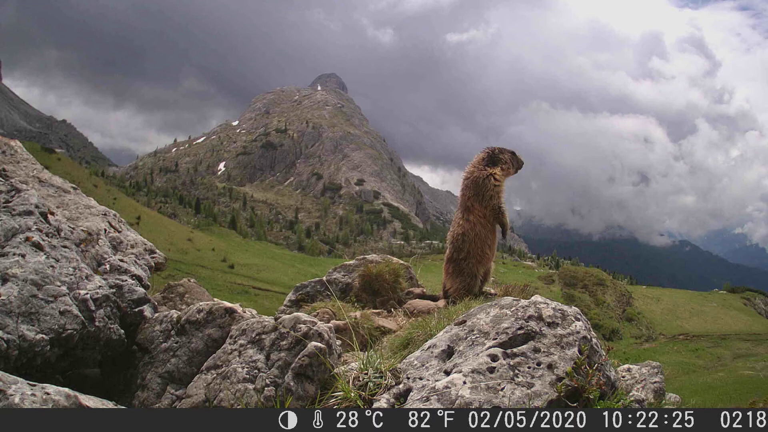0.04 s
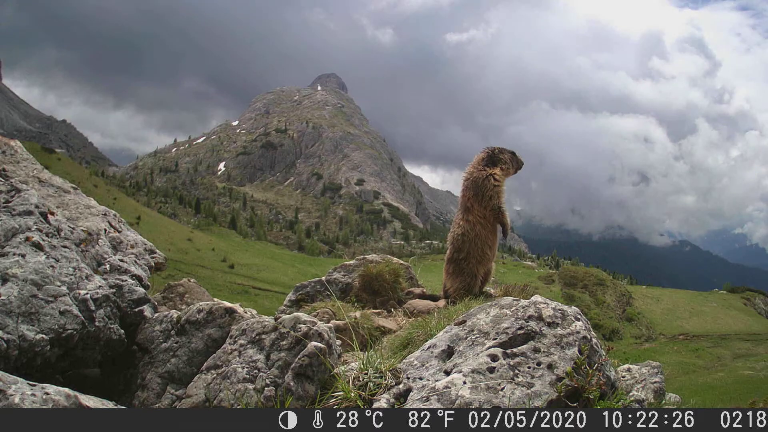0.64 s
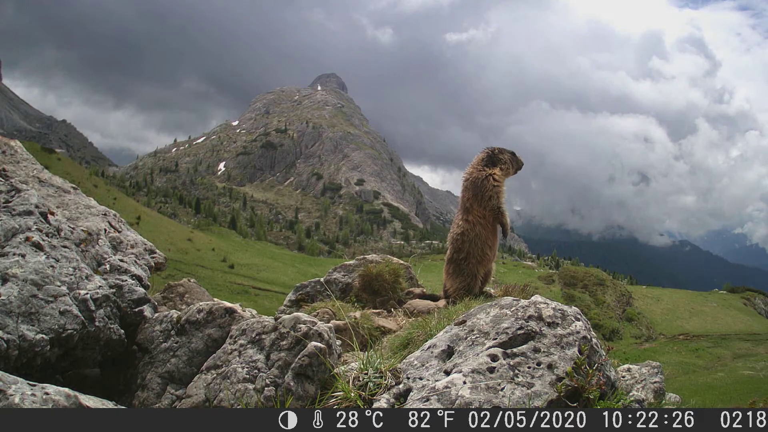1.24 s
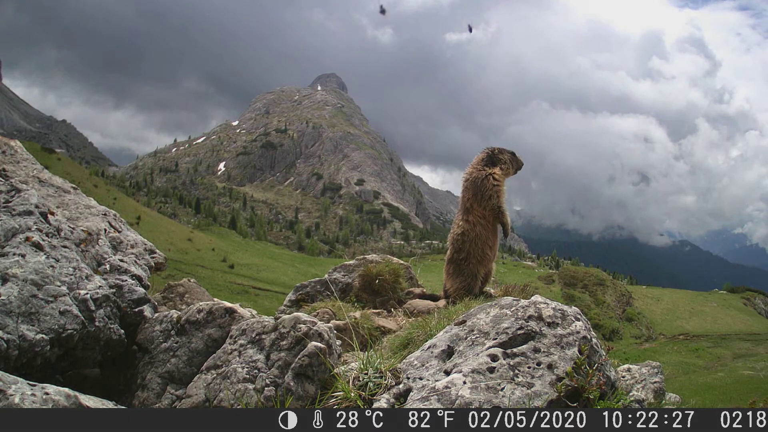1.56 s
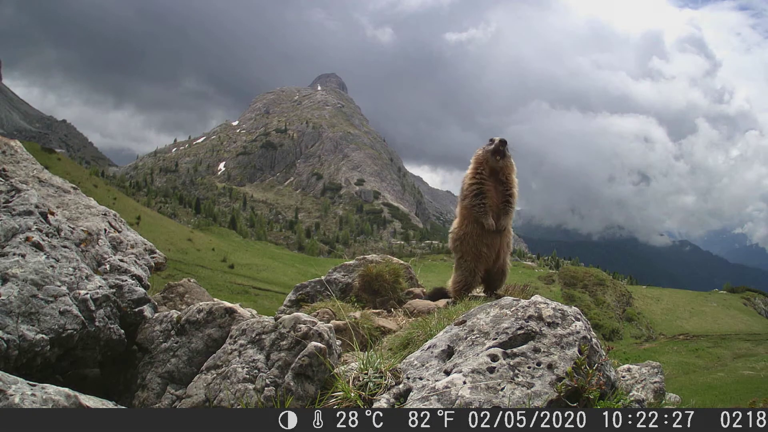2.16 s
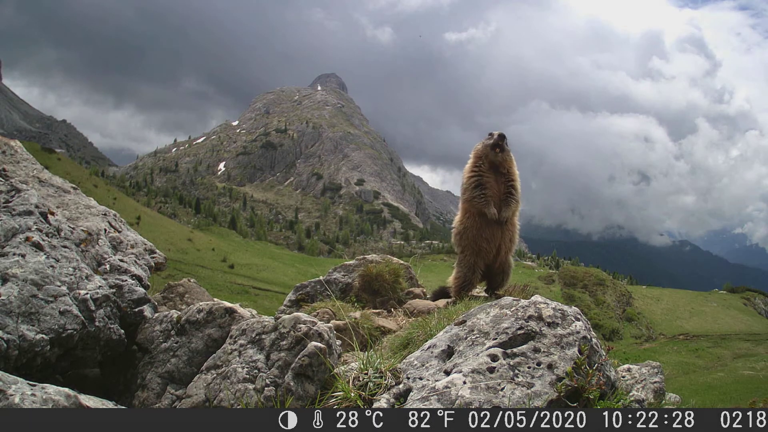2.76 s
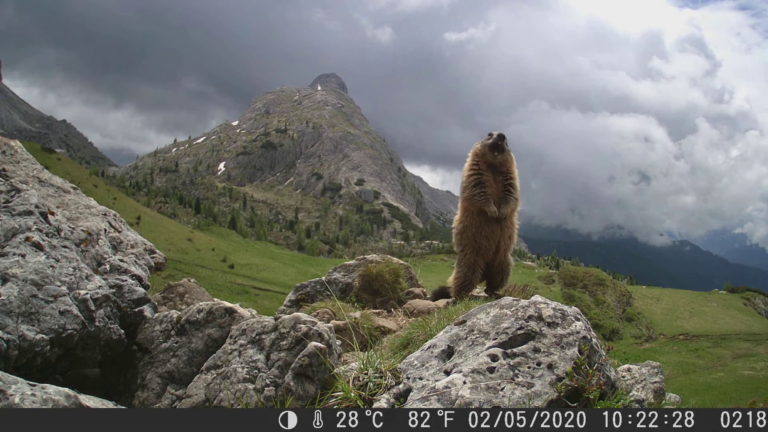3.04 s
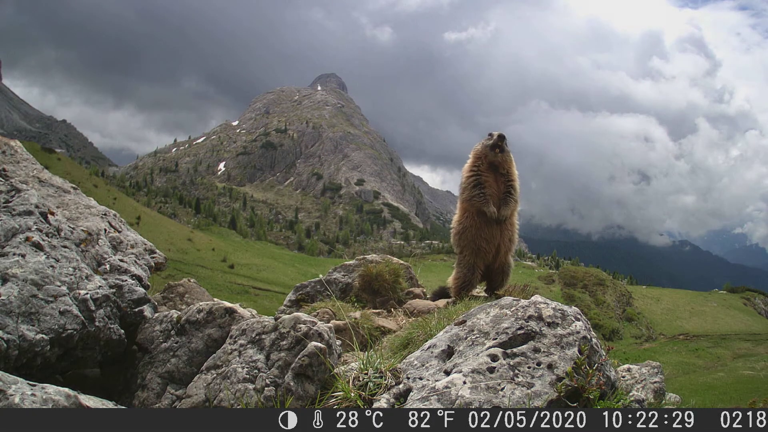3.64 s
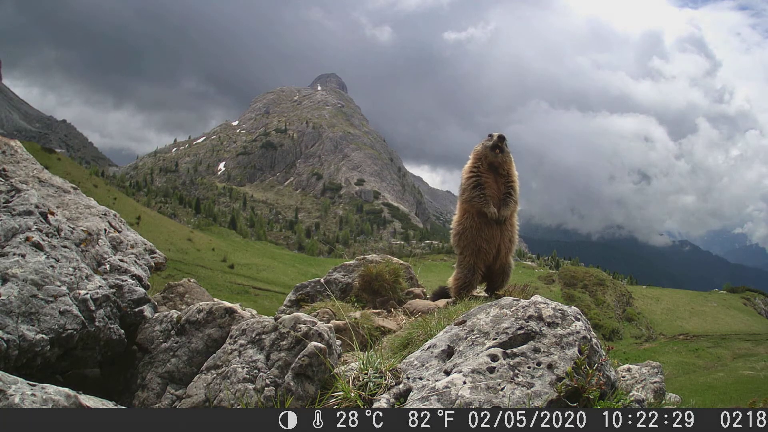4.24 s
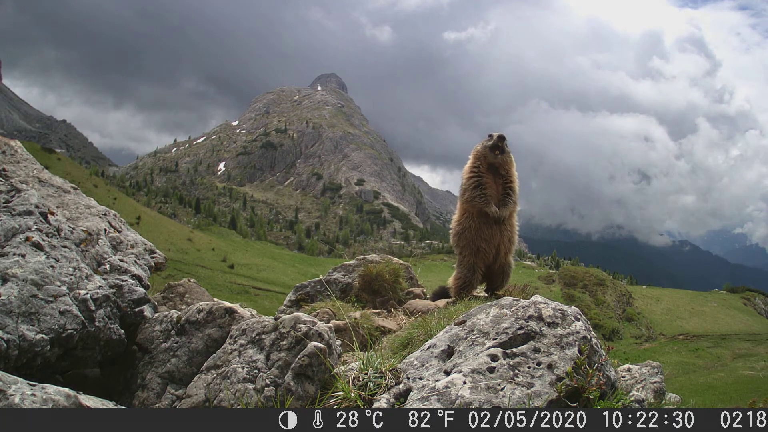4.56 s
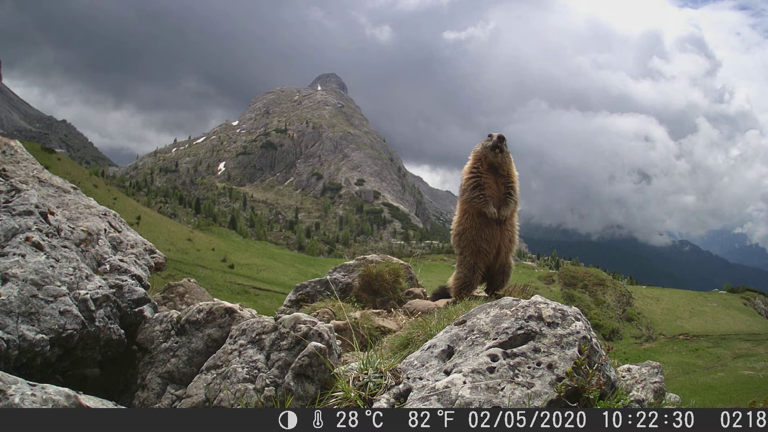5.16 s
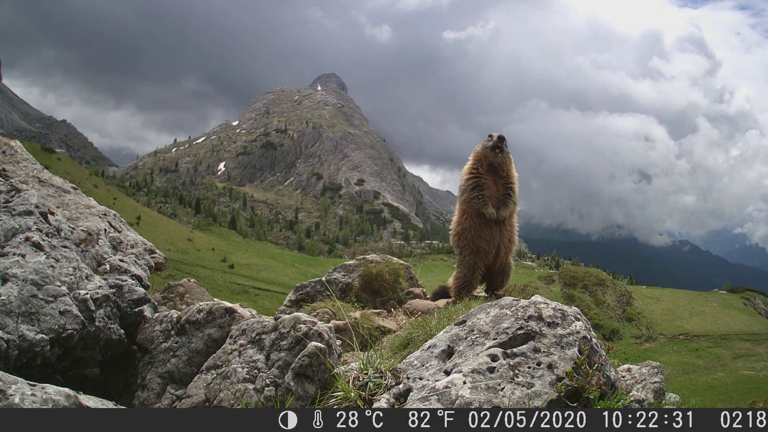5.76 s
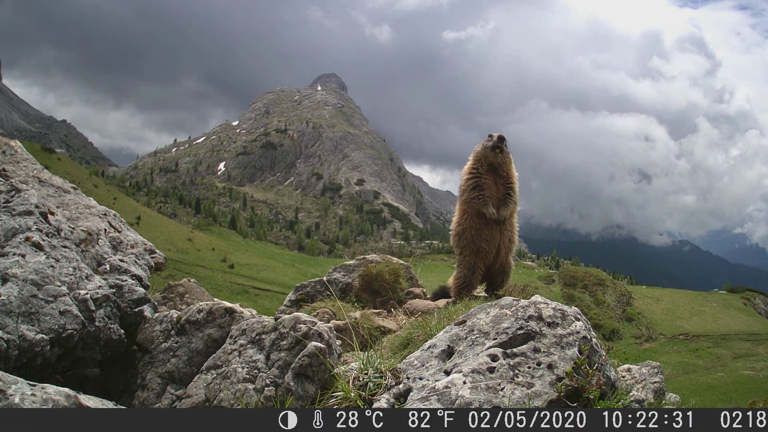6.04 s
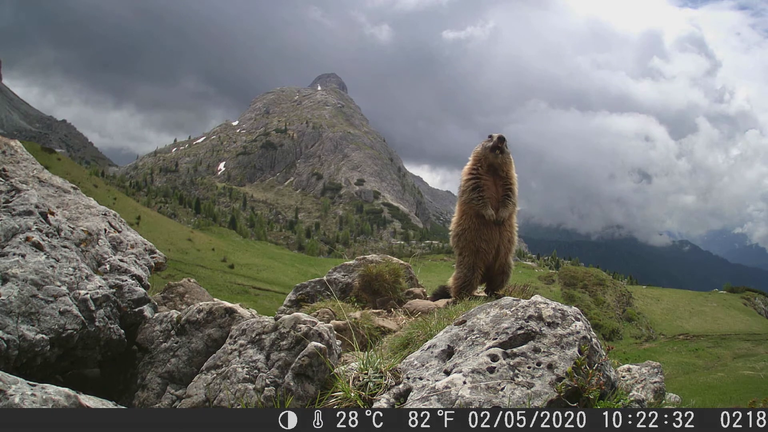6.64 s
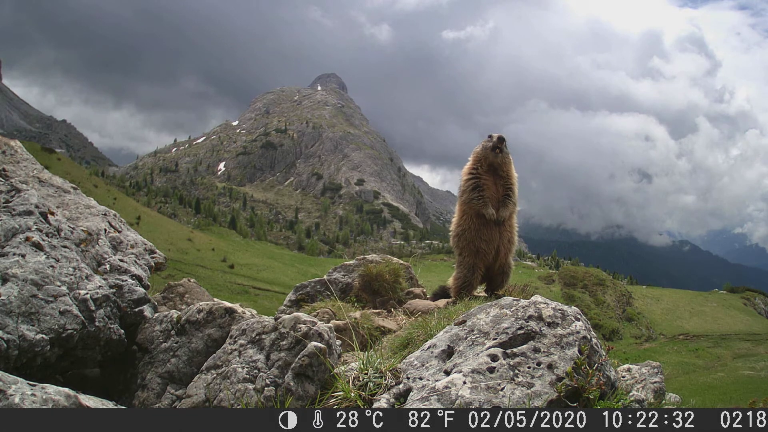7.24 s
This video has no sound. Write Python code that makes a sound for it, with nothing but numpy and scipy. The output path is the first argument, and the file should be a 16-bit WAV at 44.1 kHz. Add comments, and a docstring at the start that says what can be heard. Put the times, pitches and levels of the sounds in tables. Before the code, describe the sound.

Seven short, shrill marmot whistles ring out close to a mono microphone in an open mountain meadow. Before them come a dull switch-on thump, a stretch of quiet wind rumble and hiss, and a soft thud on turf with the first call. The whistles arch quickly in pitch, slightly raspy and glassy, and come ever further apart, answered faintly by rocks and slope while low gusts grow stronger.

```python
"""A dull thump as a trail camera's microphone switches on in a mountain meadow; wind rumbles on it over hiss.
Close by, a marmot on a rock jerks upright with a soft thud and gives seven piercing alarm whistles.
Each is one fast arch of pitch, answered faintly by the rocks and the slope. The camera's housing colours
the whistles and its coarse sampling adds glassy mirror tones. One microphone, so the sound is mono."""
import sys
import numpy as np
from scipy import signal
from scipy.fft import rfft, irfft
from scipy.io import wavfile
from scipy.ndimage import uniform_filter1d, map_coordinates

SR = 44100
rng = np.random.default_rng(int(sys.argv[2]) if len(sys.argv) > 2 else 0)


def to_wav(sig):
    """Store sig (one row per channel, or 1-D mono) as 16-bit WAV at the path in sys.argv[1].

    Samples outside -1..1 are clipped; the rate is SR.
    """
    pcm = np.clip(np.atleast_2d(sig), -1, 1) * 32767
    pcm = np.round(pcm).astype(np.int16)
    wavfile.write(sys.argv[1], SR, pcm.T)  # frames by channels


N = 326340
TIME = np.arange(N) / SR
SWITCH_ON_S = .1236


def amp(db):
    """Decibels to gain."""
    return 10 ** (np.asarray(db) / 20)


def unit_rms(x):
    """Scales to rms 1."""
    return x / np.sqrt(np.mean(x ** 2) + 1e-20)


def ease(t, width_s):
    """A smooth step from 0 to 1 around time zero."""
    return (1 + np.tanh(t / width_s / 2)) / 2


def response(points, size):
    """Gain of a table (f/Hz, level/dB) on the bins of a transform."""
    hz, db = np.transpose(points)
    bins_hz = np.fft.rfftfreq(size, 1 / SR)
    return amp(np.interp(np.log(bins_hz + 1), np.log(hz + 1), db))


def noise(points):
    """Steady noise of rms 1 with the given spectral shape."""
    return unit_rms(irfft(rfft(rng.standard_normal(N)) * response(points, N), N))


def waver(length, rate_hz):
    """A smooth random wobble of rms 1, mostly slower than the rate."""
    hz = np.fft.rfftfreq(length, 1 / SR)
    slow = np.exp(-(hz / rate_hz) ** 2) * (hz > 0)
    return unit_rms(irfft(rfft(rng.standard_normal(length)) * slow, length))


def coloured(x, points, size=4096):
    """Causal filter: resonances ring after the sound that excites them."""
    cepstrum = irfft(np.log(response(points, size)))
    cepstrum[1:size // 2] *= 2  # folded for minimum phase
    cepstrum[size // 2 + 1:] = 0
    return signal.oaconvolve(x, irfft(np.exp(rfft(cepstrum))))[:N]


def add(mix, start_s, sound):
    """Mixes a sound in at its time."""
    part = mix[round(start_s * SR):][:len(sound)]
    part += sound[:len(part)]


# Spectrum of the noise floor at the microphone: f/Hz, relative level/dB
HISS = [(20, -4), (120, 5), (300, -1), (600, -6), (1000, -10), (1800, -14.5), (2800, -19.5), (3400, -25),
        (4500, -30), (7500, -29), (8500, -32.5), (9300, -54), (15000, -53.5)]
def hiss(level_db=-64.5):
    """A faint, steady hiss behind everything."""
    return amp(level_db) * noise(HISS)


# Gusts crossing the meadow and striking the microphone: t/s, relative level/dB
GUSTS = [(0.28, -60), (0.46, -47.5), (0.65, -58.5), (1.15, -54.5), (1.33, -51), (1.5, -56.5), (3.2, -57.5),
         (4.43, -56), (4.58, -46.5), (4.75, -54), (5.02, -56.5), (5.16, -46.5), (5.38, -54.0),
         (5.58, -41.5), (5.7, -52), (5.82, -41), (5.98, -49), (6.16, -37.5), (6.45, -51), (6.6, -45),
         (6.86, -57), (7.18, -57.5), (7.35, -40.5)]
# Spectra of the eddies at the microphone and the buffets on its housing: f/Hz, relative level/dB
RUMBLE = [(5, -12), (17, 14.5), (38, 2), (65, -4), (95, -29.5), (112, -18), (135, -31), (220, -37.5),
          (450, -55), (1000, -83)]
BUFFET = [(30, -30), (80, 7), (125, -3.0), (200, -15), (400, -31), (1000, -71.5)]
def wind(rumble_db=2, buffet_db=-13, buffet_growth=1.2, breeze_db=-45, lumps_db=2.0):
    """Low eddies at the microphone come in lumps; strong gusts also buffet the housing, higher in pitch."""
    gust_db = np.interp(TIME, *np.transpose(GUSTS)) + lumps_db * waver(N, rate_hz=13)
    eddies = noise(RUMBLE)
    eddies /= np.sqrt(uniform_filter1d(eddies ** 2, size=6000))  # the gusts alone set the swell
    buffets = amp(breeze_db + buffet_db + buffet_growth * (gust_db - breeze_db)) * noise(BUFFET)
    return amp(gust_db + rumble_db) * eddies + buffets


# Colour of the thump inside the camera: f/Hz, level/dB
THUMP = [(20, -0.5), (3000, -1.5), (4000, -15), (8000, -7.0), (10000, -14.5)]
def switch_on(step_db=-28, settle_s=0.1):
    """The microphone's supply jumps on and settles: one dull thump."""
    t = np.maximum(TIME - SWITCH_ON_S, 0)
    step = amp(step_db) * np.exp(-t / settle_s) * (TIME >= SWITCH_ON_S)
    return coloured(step, THUMP)


def foot(start_s=1.968, level_db=-40, hz=85, ring_s=0.014):
    """A soft thud on the turf near the camera as the marmot jerks upright for its first call."""
    t = np.maximum(TIME - start_s, 0)
    return amp(level_db) * np.exp(-t / ring_s) * np.sin(2 * np.pi * hz * t)


# Reflections from the nearby rocks: delay t/s, level/dB
ROCKS = [(.0043, -23.5), (.0071, -16.5), (0.0095, -30.5), (0.02, -36.5)]
# Colour of all that returns from the rocks and the slope: f/Hz, level/dB
SLOPE = [(500, -24.5), (1400, -12), (1900, -11), (2350, -6), (2720, -1), (3100, -5), (3700, -22.5),
         (8000, -15.5)]
def meadow(x, near_db=-23.5, near_t60_s=.17, far_db=-47, far_t60_s=.4):
    """What comes back to the microphone: a few rock reflections and a short faint scatter off the slope."""
    t = TIME[:SR]
    near, far = rng.standard_normal((2, SR)) * (1 - np.exp(-t / 0.0023))
    near *= amp(-60 * t / near_t60_s)
    far *= amp(-60 * t / far_t60_s)
    echo = amp(near_db) * near / np.linalg.norm(near) + amp(far_db) * far / np.linalg.norm(far)
    for delay_s, db in ROCKS:
        add(echo, delay_s, amp([db]))
    return coloured(signal.oaconvolve(x, echo)[:N], SLOPE)


# Spectrum of the grit that the camera's coarse steps add to a loud sound: f/Hz, relative level/dB
GRIT = [(300, -5), (1800, -2.5), (3400, -1), (3900, -11.5), (4600, -1), (6800, 4.5), (8000, -13),
        (9300, -1), (11000, -4.5), (12500, -12.5)]
def coarse_sampling(x, clock_hz=16000, drift_s=3e-6, grit_db=-29.0):
    """Each sample is held until the next: a tone gains mirror tones, the strongest sinking as it rises."""
    clock = TIME + drift_s * waver(N, rate_hz=100)
    held_s = (clock * clock_hz % 1) / clock_hz
    stairs = map_coordinates(x, [(TIME - held_s) * SR], order=3, mode="nearest")
    running_rms = np.sqrt(abs(uniform_filter1d(x ** 2, size=90)))
    return stairs + amp(grit_db) * running_rms * noise(GRIT)


# Spectrum of the breath at the marmot's mouth: f/Hz, relative level/dB
PUFF = [(500, -21.5), (1100, -2.5), (1700, 5.5), (2600, -7), (3500, -10), (6000, -28.5)]
def puffs(calls, level_db=-30, lead_s=0.0086, width_s=0.012):
    """Turbulent air just ahead of each tone, stronger in a rough call."""
    breaths = sum(rough * np.exp(-((TIME - attack_s + lead_s) / width_s) ** 2)
                  for attack_s, *_, rough in calls)
    return amp(level_db) * breaths * noise(PUFF)


def pitch_arch(t, length_s, crest_hz, sag_hz_per_s, start_hz=901.6, sag_lead_s=.034, sag_ease_s=.0071):
    """Pitch in Hz: it sweeps up, fastest just before the attack, hangs at the crest, then sags steadily."""
    sweep_hz = (crest_hz - start_hz) * ease(t + .0063, width_s=.0068)
    sagging_s = sag_ease_s * np.logaddexp(0, (t - length_s + sag_lead_s) / sag_ease_s)
    return start_hz + sweep_hz - sag_hz_per_s * sagging_s


def squeak(t, level_db=-23.5, lead_s=0.016, width_s=.0058, rasp=.25):
    """Envelope of the soft, hoarse squeak that comes before the voice opens."""
    hump = amp(level_db) * np.exp(-((t + lead_s) / width_s) ** 2)
    return hump * (1 + rasp * waver(len(t), rate_hz=700))


def whistle(attack_s, length_s, crest_hz, sag_hz_per_s, attack_db, top_db, fall_db, rough,
            jitter=.02, shimmer=.55, relax=0.56, octave_db=-19, rasp_db=-19):
    """A nearly pure tone arches and flutters at its strained top; returns its start time and sound."""
    t = np.arange(-.035, length_s + .025, 1 / SR)  # zero at the attack
    # The voice snaps open with a burst, is choked at the crest, swells as the pitch sags, and shuts.
    opening = ease(t + .005, width_s=.0005)
    burst = ease(.0088 - t, width_s=.002)
    swell = ease(t - length_s + .023, width_s=.0045)
    shutting = ease(length_s + .0095 - t, width_s=.0015)
    level_db = top_db + (attack_db - top_db) * burst + (fall_db - top_db) * swell
    voiced = amp(level_db) * opening * shutting
    strain = rough * (1 - relax * swell)
    hz = pitch_arch(t, length_s, crest_hz, sag_hz_per_s)
    hz *= 1 + jitter * strain * waver(len(t), rate_hz=620)
    phase = 2 * np.pi * np.cumsum(hz) / SR
    flutter = 1 + shimmer * strain * (1 - burst / 2) * (1 - swell / 2) * waver(len(t), rate_hz=200)
    # Turbulence puts a noisy skirt around the tone.
    rasp = amp(rasp_db) * np.sqrt(strain) * waver(len(t), rate_hz=1300)
    tone = (1 + rasp) * np.sin(phase) + amp(octave_db) * np.sin(2 * phase)
    return attack_s + t[0], (voiced * flutter + squeak(t)) * tone


# The calls as they leave the rock: attack t/s, length from attack to loud fall t/s, crest f/Hz,
# sag/(Hz/s), attack level/dB, top level/dB, fall level/dB, roughness/(0-1)
WHISTLES = [(1.96, 0.098, 3280, 24870, -8, -27.5, -15.5, 0.81),
            (2.461, 0.077, 3209, 22420, -11, -23.5, -17, 0.53),
            (3.0033, 0.072, 3189, 21140, -11.5, -25.5, -20.5, 0.5),
            (3.6691, 0.071, 3180, 21000, -12, -22, -18.5, 0.4),
            (4.3696, 0.074, 3165, 21030, -11.5, -23, -19.5, .33),
            (5.294, 0.077, 3181, 21960, -11.5, -22.5, -17.5, .28),
            (6.3482, 0.072, 3160, 21660, -11, -22.5, -17.5, 0.37)]
# Response of the microphone in its housing, facing the animal: f/Hz, level/dB
HOUSING = [(500, -15.5), (1000, -9), (1420, -11), (1750, -17.5), (2130, -9), (2310, -5.5), (2450, -1.5),
           (2820, -6), (2965, -17.5), (3060, -6.5), (3350, -6), (3850, -30.5), (4500, -4.5), (5100, -19),
           (7500, -18.5)]
def marmot():
    """Whistles at close range, direct and off the meadow; only they are loud enough for mirror tones."""
    voice = puffs(WHISTLES)
    for call in WHISTLES:
        add(voice, *whistle(*call))
    return coarse_sampling(coloured(voice, HOUSING) + meadow(voice))


def scene():
    """Close whistles over wind and hiss, one microphone feeding both channels."""
    background = (wind() + hiss()) * (TIME >= SWITCH_ON_S)
    return np.tile(background + switch_on() + foot() + marmot(), (2, 1))


# Overall treble shape, with a notch near 12 kHz and fading above 14 kHz: f/Hz, level/dB
TREBLE = [(20, 3.5), (11200, -0.5), (12000, -20), (12700, -1), (13900, 1), (14450, -17.5), (15300, -30.5)]
def record(dry, edge_hz=15300):
    """Dulls the highest treble and cuts it off near 15 kHz."""
    dulled = np.array([coloured(channel, TREBLE) for channel in dry])
    lowpass = signal.firwin(301, edge_hz, window=("kaiser", 8), fs=SR)
    return signal.oaconvolve(dulled, lowpass[None], "same", axes=1)


dry = scene()
out = record(dry)
to_wav(out)
```